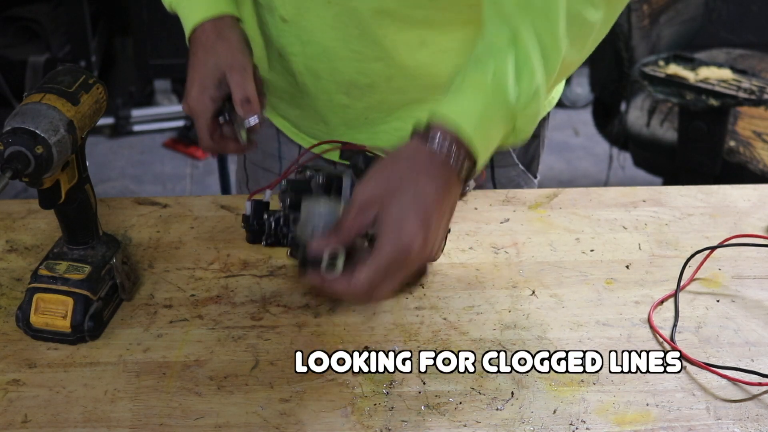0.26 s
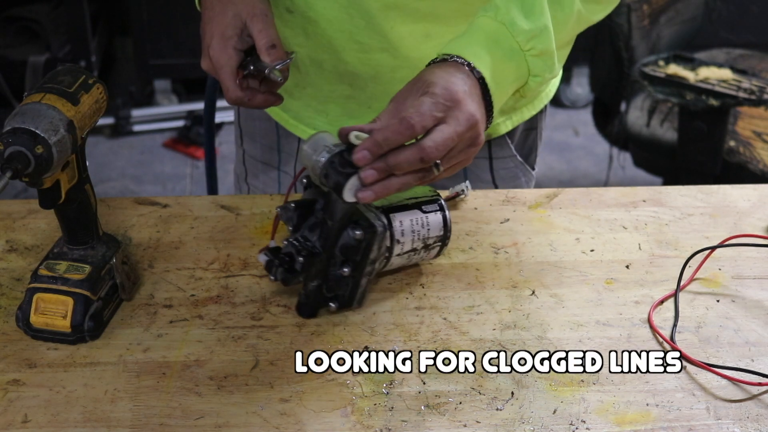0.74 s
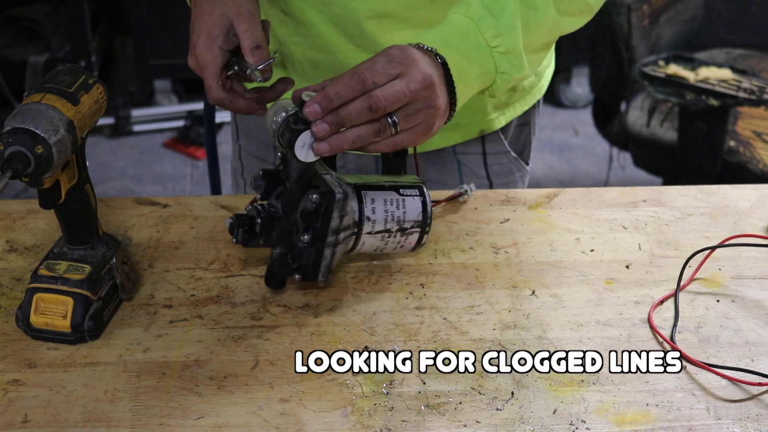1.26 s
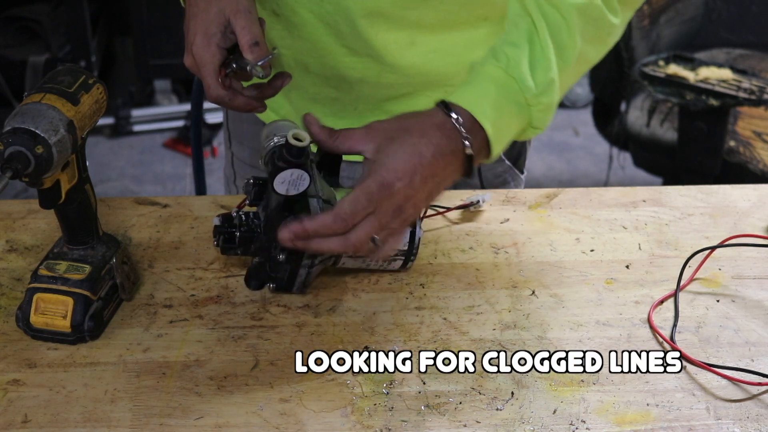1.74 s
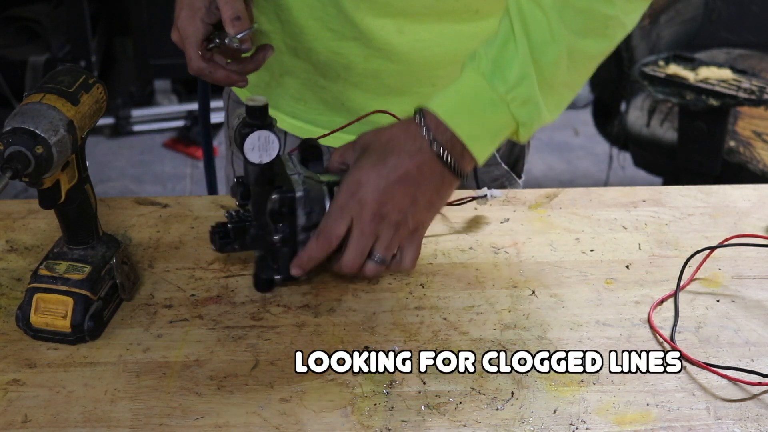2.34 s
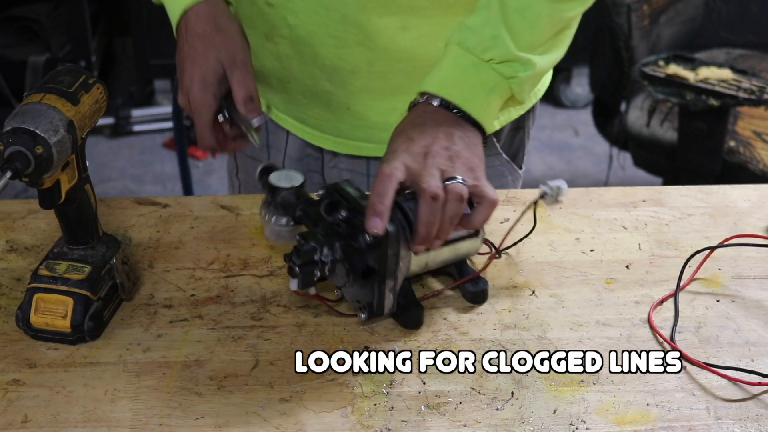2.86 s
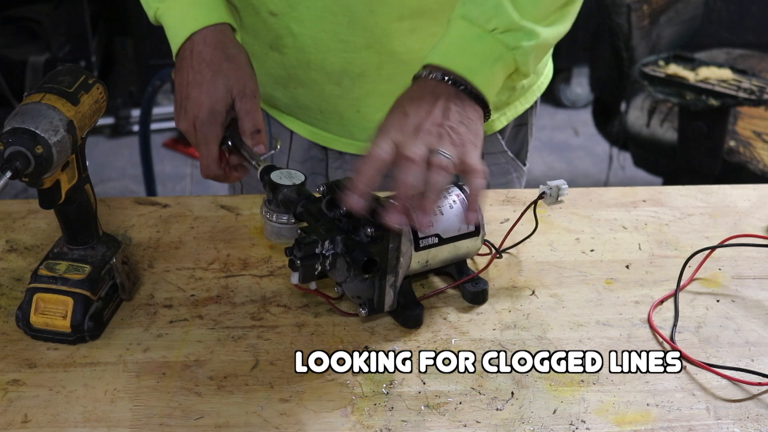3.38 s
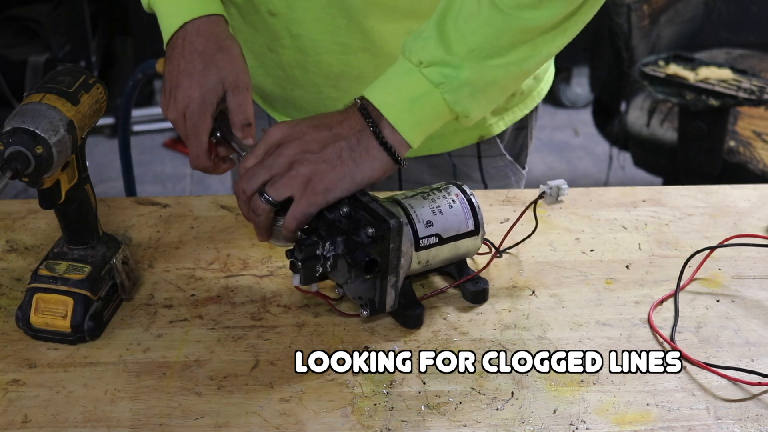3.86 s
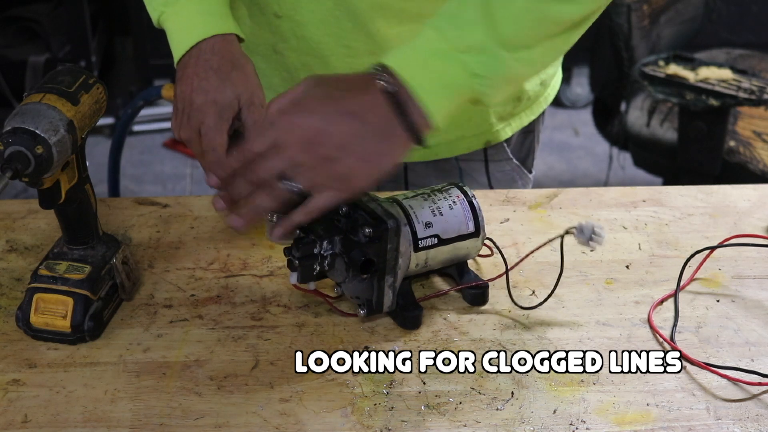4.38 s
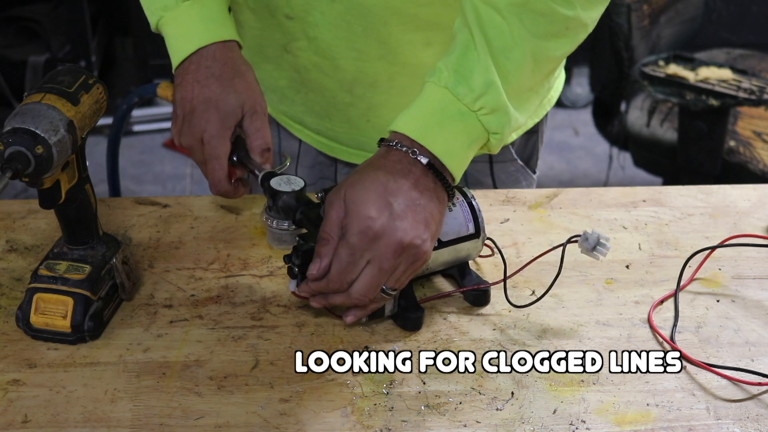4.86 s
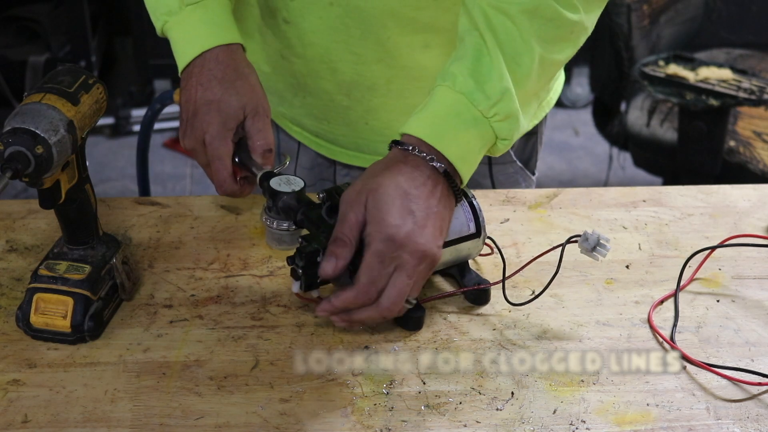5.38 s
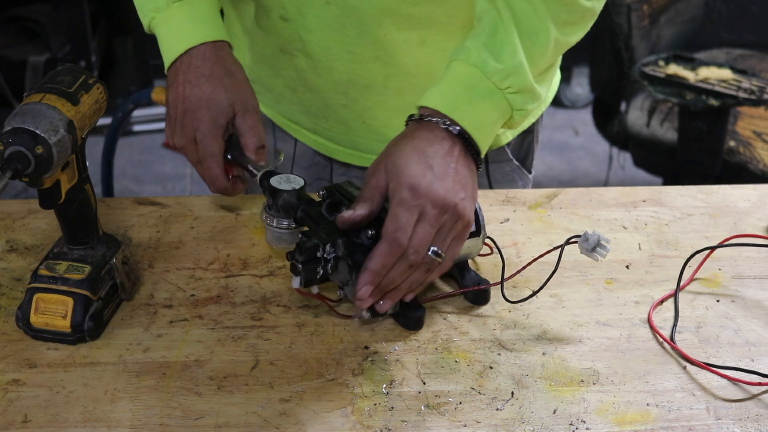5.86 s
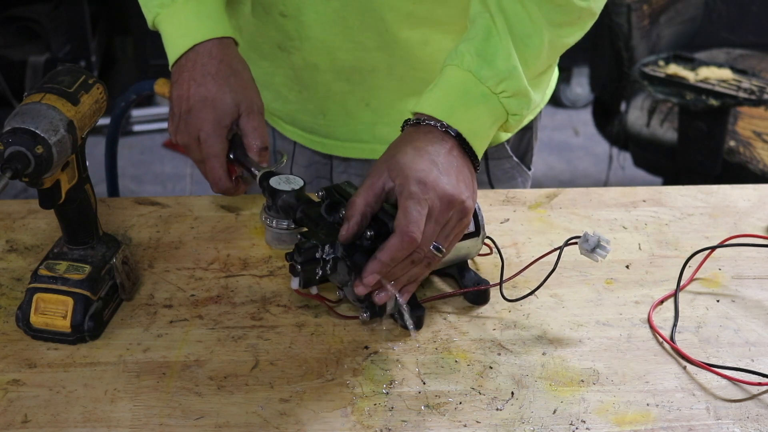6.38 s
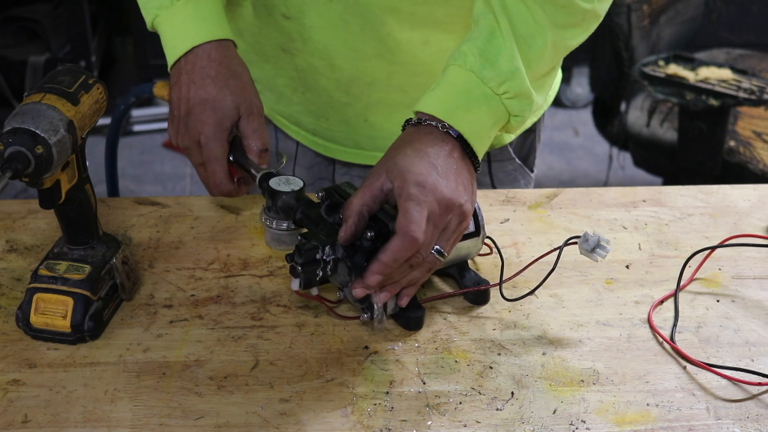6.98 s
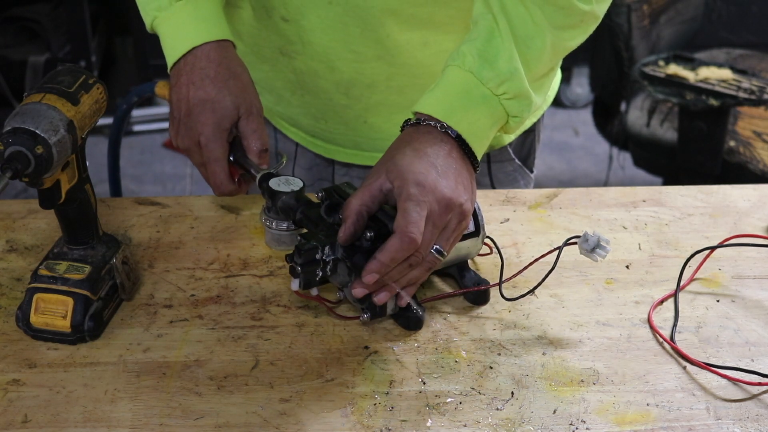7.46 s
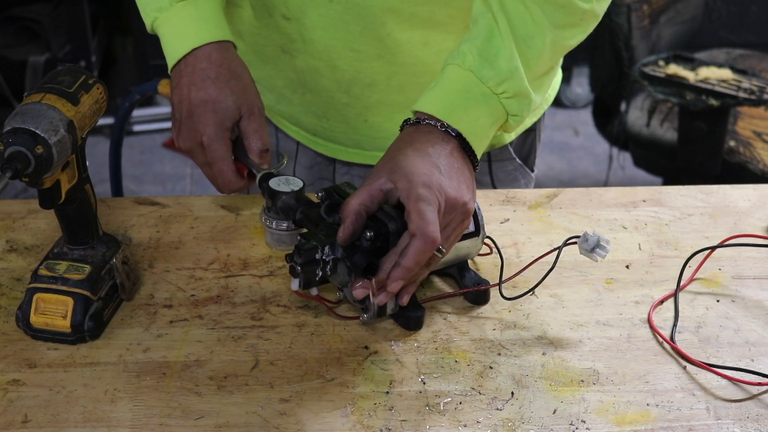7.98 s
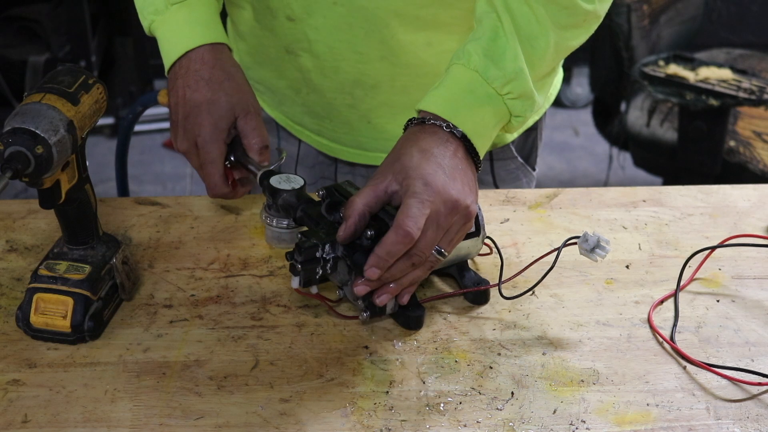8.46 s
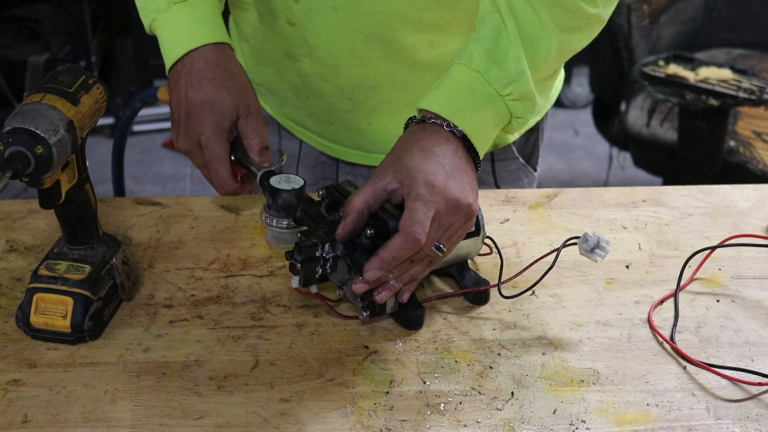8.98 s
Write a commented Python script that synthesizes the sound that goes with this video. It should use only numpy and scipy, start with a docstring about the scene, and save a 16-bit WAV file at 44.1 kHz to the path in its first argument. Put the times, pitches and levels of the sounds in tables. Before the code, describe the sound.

Small pump clunks and scrapes on a wooden workbench, then three hissing blasts of compressed air roar and gurgle through it.

```python
"""A workshop hums; on a wooden bench a small pump is scraped, ticked and thudded about as it is turned and set down.
Then a blow gun sends three blasts of air into its inlet: hiss at the nozzle, roar through the pump chambers.
Hum, rubbing and air are coloured noise; thuds are decaying bench tones; ticks are snaps in a narrow band.
Squeak, whistle and a far motor are wavering tones. The room adds sparse fading echoes to air and knocks."""
import sys
import numpy as np
from scipy import signal
from scipy.io import wavfile
from scipy.ndimage import uniform_filter1d

SR = 44100
rng = np.random.default_rng(int(sys.argv[2]) if len(sys.argv) > 2 else 0)


def materialize(psi):
    """Save the field psi as 16-bit PCM at rate SR to the path in sys.argv[1].

    A 1-D psi becomes a single channel; in a 2-D psi each row is a channel.
    """
    bounded = np.clip(np.atleast_2d(psi).T, -1, 1)
    quanta = np.round(bounded * 32767).astype(np.int16)
    wavfile.write(sys.argv[1], SR, quanta)


def volts_from_db(level):
    """Convert decibel levels to linear amplitude ratios."""
    exponent = np.asarray(level, float) / 20
    return 10 ** exponent


N = 406602


def read(points, hz):
    """Reads a table over pitch, joining its points on a log pitch axis."""
    pitch_hz, value = np.transpose(points)
    return np.interp(np.log(hz + 1), np.log(pitch_hz + 1), value)


def follow(rows, column, rest=-120):
    """Gives one column of a timed table at every sample, and the rest value outside its times."""
    out = np.full(N, float(rest))
    rows = np.array(rows)
    at = np.arange(round(rows[0, 0] * SR), min(round(rows[-1, 0] * SR), N))
    out[at] = np.interp(at / SR, rows[:, 0], rows[:, column])
    return out


def add(mix, start_s, sound):
    """Mixes a sound in from its start time."""
    part = mix[:, round(start_s * SR):][:, :sound.shape[1]]
    part += sound[:, :part.shape[1]]


def no_phase(hz):
    """Leaves left and right in step at every pitch."""
    return 0 * hz


def noise(colour_db, same, patchy_db, phase=no_phase, size=1024):
    """Makes stereo noise from random short spectra with drifting patches; left and right average to rms 1."""
    hz = np.fft.rfftfreq(size, 1 / SR)
    a, b, c, d, patch = rng.standard_normal((4 * N // size + 5, len(hz), 5)).T
    patch = uniform_filter1d(patch, size=10, axis=0)  # smooth over pitch
    patch = uniform_filter1d(patch, size=8, axis=1)  # smooth over time
    like = np.clip(read(same, hz), -1, 1)[:, None]
    left = a + 1j * b
    right = like * left + np.sqrt(1 - like ** 2) * (c + 1j * d)
    right = right * np.exp(-1j * phase(hz))[:, None]
    level_db = colour_db(hz)[..., None] + patchy_db * patch / patch.std()
    spectra = np.array([left, right]) * volts_from_db(level_db)
    x = signal.istft(spectra, nperseg=size, noverlap=size - size // 4)[1][:, :N]
    return x / x.mean(0).std()


def gritty(spread_db, size):
    """Fast uneven gain with mean power 1: spits, grains and stick-slip. Size is the smoothing in samples."""
    rough = uniform_filter1d(rng.standard_normal(N), size)
    gain = volts_from_db(spread_db * rough / rough.std())
    return gain / np.sqrt(np.mean(gain ** 2))


# colour of the shop hum, then of the deep rumble: pitch_hz, level_db (per Hz, relative)
HUM_COLOUR = [(15, -39), (25, -3), (49, -0.5), (144, -3.5), (174, -0.5), (361, -5), (435, -1), (586, -10.5),
              (901, -13), (1460, -14), (3470, -25), (8000, -32), (11500, -35), (15700, -42)]
DEEP_COLOUR = [(15, -31), (30, -10), (60, 7), (110, -3.5), (200, -9), (400, -80.5)]
# how alike left and right are: pitch_hz, likeness (-1 to 1)
HUM_LIKENESS = [(60, 0.97), (180, 1), (550, 0.73), (1650, -0.31), (4970, -0.28), (15000, 0.25)]
# swells of the deep rumble: start_s, level_db
DEEP_SWELLS = [(5.05, -70), (5.45, -59), (5.7, -44), (6.0, -42), (6.3, -58), (8.3, -63), (8.6, -44),
               (9.22, -50)]


def hum():
    """Distant machines and air as steady coloured noise, over a deep rumble that swells now and then."""
    shop_hum = noise(lambda hz: read(HUM_COLOUR, hz), HUM_LIKENESS, 1.0, size=2048)
    deep = noise(lambda hz: read(DEEP_COLOUR, hz), HUM_LIKENESS, .7, size=4096)
    return volts_from_db(-41) * shop_hum + volts_from_db(follow(DEEP_SWELLS, column=1)) * deep


def fuzzy_tone(rows, width_hz):
    """A tone whose size and phase wander: a narrow band of noise on a pitch curve."""
    turns = np.cumsum(follow(rows, column=1, rest=0)) / SR
    r = np.exp(-np.pi * width_hz / SR)
    drive = rng.standard_normal(N) + 1j * rng.standard_normal(N)
    wander = signal.lfilter([1], [1, -2 * r, r * r], drive)
    tone = (wander * np.exp(2j * np.pi * turns)).real
    return volts_from_db(follow(rows, column=2)) * tone / tone.std()


# level of the far motor: start_s, level_db
MOTOR_LEVEL = [(0, -57.5), (5.3, -60), (5.6, -41), (6.0, -39.5), (6.1, -47), (7.1, -52), (8.0, -48.5),
               (9.22, -45)]


def far_motor():
    """A far motor drones as a narrow wavering tone on one pitch."""
    pitch_hz = 111.7
    rows = [(start_s, pitch_hz, level_db) for start_s, level_db in MOTOR_LEVEL]
    return fuzzy_tone(rows, width_hz=9)


# colour of bench rumble, scraping feet, rustling wire and hand: pitch_hz, level_db (per Hz, relative)
RUMBLE_COLOUR = [(24, -46), (40, -17), (69, -6.5), (152, -2), (215, -2.5), (257, -1.5), (490, -9),
                 (641, -16), (1000, -26.5), (1300, -52), (2200, -120)]
SCRAPE_COLOUR = [(470, -22), (800, -0.5), (940, -14), (1120, 1), (1580, -1.5), (2340, -5), (3360, -6),
                 (5000, -32), (6500, -47), (11000, -120)]
RUSTLE_COLOUR = [(2820, -1.5), (4800, -4), (7980, -3.5), (8650, -6), (9430, -7.5), (15000, -20),
                 (16000, -31.5)]
# how alike left and right are, for rubbing and for air: pitch_hz, likeness (0 to 1)
AIR_LIKENESS = [(100, 1), (700, 0.99), (1300, 1), (2400, 0.86), (4400, 0.83), (8000, 0.7), (12000, 0.55),
                (15000, 0.6)]
# the pump rocks on after a blow: start_s, rumble_db, scrape_db, rustle_db
ROCKING = [(0.503, -23.5, -48, -51), (.6, -27, -49.5, -53), (1.55, -18, -43, -41.5),
           (1.59, -22, -44.5, -49), (2.099, -30, -49, -48)]
# how fast rocking dies: rumble_db_per_s, scrape_db_per_s, rustle_db_per_s
ROCKING_FADE = (80, 57, 72)
# the pump is dragged: start_s, strongest_s, end_s, then at the strongest rumble_db, scrape_db, rustle_db
DRAGGING = [(.12, 0.332, 0.52, -41, -45, -49), (0.326, 0.448, 0.51, -29.5, -36.5, -44),
            (1.56, 1.67, 1.81, -36, -49, -53), (1.794, 2.025, 2.13, -36, -43, -50.5),
            (2.23, 2.434, 2.8, -46, -46, -51.5), (2.492, 2.632, 2.7, -43.5, -71, -47),
            (2.85, 3.0, 3.12, -61.5, -49, -62), (3.05, 3.222, 3.42, -34, -40, -58),
            (4.078, 4.208, 4.4, -48.5, -50, -53)]


def handling():
    """The bench rumbles under the rocking or dragged pump; feet, wire and hand rub unevenly."""
    rumble = noise(lambda hz: read(RUMBLE_COLOUR, hz), [(60, .99), (900, .93)], 1.5, size=2048)
    rumble = rumble * gritty(1.2, size=500)
    scrape = noise(lambda hz: read(SCRAPE_COLOUR, hz), AIR_LIKENESS, 2.5, size=512) * gritty(2.5, size=90)
    rustle = noise(lambda hz: read(RUSTLE_COLOUR, hz), AIR_LIKENESS, 3, size=512) * gritty(1.8, size=60)
    t = np.arange(N) / SR
    swell = np.zeros((3, N))
    fading = volts_from_db(-np.outer(ROCKING_FADE, t[:SR]))
    for start_s, *level_db in ROCKING:
        add(swell, start_s, volts_from_db(level_db)[:, None] * fading)
    edge_db = -22  # a drag starts and ends this far below its strongest point
    for start_s, top_s, end_s, *level_db in DRAGGING:
        shape_db = np.interp(t, (start_s, top_s, end_s), (edge_db, 0, edge_db), -120, -120)
        swell += np.outer(volts_from_db(level_db), volts_from_db(shape_db))
    swell = uniform_filter1d(swell, size=300, axis=1)  # rubbing starts softly
    return swell[0] * rumble + swell[1] * scrape + swell[2] * rustle


# small parts that tick, by name: lowest_hz, highest_hz, left_minus_right_db,
# rattle_t60_s (time to fade 60 dB; anything under 0.002 plays as 0.002)
SMALL_PARTS = {"plastic": (2100, 4804, -7, -0.09), "nozzle": (2500, 13000, -.5, .035),
               "wire": (6000, 11500, -1, .009), "fitting": (1041, 2000, -3, -0.21),
               "connector": (1212, 8000, -9, -0.05), "clip": (10500, 14000, -11, .02),
               "drip": (1148.5, 1352, 3, -1), "valve": (770, 8200, 1, 0.016)}
# ticks of plastic, wire, fittings and the valve: start_s, peak_db, part
TICK_TIMES = [(0.417, -21, "connector"), (.443, -20, "connector"), (.4945, -14.5, "plastic"),
              (0.4953, -22, "wire"), (.4945, -25, "clip"), (1.578, -13, "plastic"), (1.585, -21, "plastic"),
              (.372, -25, "fitting"), (.482, -24, "wire"), (.482, -31, "clip"), (2.758, -36, "wire"),
              (2.764, -31, "connector"), (3.02, -41, "wire"), (1.923, -25, "connector"),
              (1.968, -35, "plastic"), (2.143, -26, "plastic"), (2.156, -27, "connector"),
              (2.164, -24, "plastic"), (2.176, -22.5, "connector"), (2.385, -33, "wire"),
              (2.398, -28.5, "wire"), (2.398, -29, "fitting"), (2.458, -33, "fitting"),
              (2.603, -26.5, "wire"), (2.602, -17, "plastic"), (2.648, -22.5, "plastic"),
              (2.758, -25, "plastic"), (2.77, -26.5, "fitting"), (4.228, -25, "plastic"),
              (4.238, -25, "connector"), (4.298, -15.5, "connector"), (4.298, -17, "plastic"),
              (4.298, -27, "wire"), (4.301, -22, "fitting"), (4.41, -55, "clip"), (4.889, -34, "wire"),
              (4.889, -39, "plastic"), (8.873, -17, "nozzle"), (8.412, -20, "drip"), (5.567, 1.5, "valve")]


def ticks():
    """A sharp snap followed by a short rattle, in the band the small part rings in."""
    soft_hz = 2500  # contacts are not quite sharp: treble slopes off above this
    out = np.zeros((2, N))
    t = np.arange(SR // 20) / SR
    rattles = rng.standard_normal((len(TICK_TIMES), len(t)))
    for (start_s, peak_db, part), rattle in zip(TICK_TIMES, rattles):
        low_hz, high_hz, side_db, t60_s = SMALL_PARTS[part]
        drive = (t == 0) + .25 * rattle * volts_from_db(-60 * t / max(t60_s, .002))
        drive = signal.lfilter([1], [1, -np.exp(-2 * np.pi * soft_hz / SR)], drive)
        band = signal.butter(4, [low_hz, high_hz], "bandpass", fs=SR, output="sos")
        tick = signal.sosfilt(band, drive)
        level_db = peak_db + np.array([[.5], [-.5]]) * side_db
        add(out, start_s, volts_from_db(level_db) * tick / abs(tick).max())
    return out


# the echoes of the shop: pitch_hz, t60_s (time to fade 60 dB)
SHOP_FADE = [(250, 0.43), (1000, 0.54), (4000, 0.52), (9000, 0.41), (15000, 0.32)]
# how alike the echoes are left and right: pitch_hz, likeness (0 to 1)
SHOP_LIKENESS = [(300, 0.78), (1500, 0.32), (6000, .3)]


def shop(x):
    """Sparse echoes of random sign, each band dying at its own speed; bass is more alike left and right."""
    taps = np.zeros((2, SR))
    at = np.arange(200, SR - 20, 20) + rng.integers(0, 20, (2, (SR - 201) // 20))
    np.put_along_axis(taps, at, rng.choice([-1., 1.], at.shape), 1)
    hz, t, z = signal.stft(taps, SR, nperseg=256)
    like = np.clip(read(SHOP_LIKENESS, hz), 0, 1)[:, None]
    z = np.array([z[0], like * z[0] + np.sqrt(1 - like ** 2) * z[1]])
    fade = volts_from_db(-60 * t / read(SHOP_FADE, hz)[:, None])
    tail = signal.istft(z * fade, SR, nperseg=256)[1]
    tail = tail / np.linalg.norm(tail[0])
    return signal.fftconvolve(x.mean(0)[None], tail, axes=1)[:, :N]


# blows on the bench: start_s, peak_db, high_lift_db (above 1000 Hz), deep_lift_db (below 200 Hz)
THUD_TIMES = [(0.482, -7, -7, 9.5), (0.4948, -9.5, -5, 10), (0.589, -5.5, -22, 8.5),
              (1.5367, 1.5, -10.5, 3), (1.5421, -9, -7, 16), (1.577, -1.5, -11, -10),
              (1.583, -12, -9.5, -17), (1.64, -9.5, -41, 9), (1.748, -17.5, -34, 4),
              (2.085, -12, -27, 13.5), (5.083, -33, -9, -9), (5.569, -14, -14, -8), (5.856, -14.5, -10, -6),
              (6.0, -17.5, -22, -3)]
# tones the bench rings with: pitch_hz, level_db (relative), t60_s (time to fade 60 dB)
BENCH_TONES = [(85, -11.5, 0.21), (164, 0.5, 0.046), (246, -3, 0.045), (260, -10, 0.1), (326, 12, 0.018),
               (384, 2, 0.024), (472, -11.5, 0.077), (750, -12.5, 0.066), (957, -15, 0.015),
               (1184, 10.5, 0.014), (1496, 16, 0.0051), (1980, 10.5, 0.0045), (2700, -5, 0.011),
               (3510, 1.5, 0.012), (4080, -79, 0.014)]


def thuds():
    """Each blow rings the bench with its own share of high and deep tones; deeper tones swell in later."""
    out = np.zeros((2, N))
    t = np.arange(SR // 3) / SR
    chance = rng.standard_normal((len(THUD_TIMES), len(BENCH_TONES)))
    for (start_s, peak_db, high_db, deep_db), spot in zip(THUD_TIMES, chance):
        blow = np.zeros(len(t))
        for (hz, tone_db, t60_s), luck in zip(BENCH_TONES, spot):
            level_db = tone_db + 1.5 * luck + high_db * (hz > 1000) + deep_db * (hz < 200)
            swell = 1 - np.exp(-1.5 * hz * t)
            blow += volts_from_db(level_db - 60 * t / t60_s) * swell * np.sin(2 * np.pi * hz * t)
        add(out, start_s, volts_from_db(peak_db) * np.array([blow, blow]) / abs(blow).max())
    return out


# wavering squeak of the rubber feet: start_s, pitch_hz, level_db
SQUEAK_CURVE = [(1.87, 3850, -72), (2.06, 4050, -64), (2.2, 4050, -69), (2.42, 4060, -62), (2.6, 4080, -58),
                (2.66, 4080, -61), (2.74, 4060, -71)]


def feet_squeak():
    """The rubber feet squeak faintly: a narrow wavering tone on a moving pitch."""
    return fuzzy_tone(SQUEAK_CURVE, width_hz=41)


# wavering whistle of the leaking nozzle: start_s, pitch_hz, level_db
WHISTLE_CURVE = [(4.41, 7300, -70), (4.45, 7400, -64), (4.5, 7350, -67), (4.55, 7700, -62),
                 (4.575, 7600, -64), (4.59, 6800, -66), (4.625, 7300, -68), (4.64, 6400, -66),
                 (4.66, 6500, -61), (4.68, 6500, -76)]


def nozzle_whistle():
    """The nozzle leaks a faint whistle: a wavering tone, wider than the squeak."""
    return fuzzy_tone(WHISTLE_CURVE, width_hz=120)


# the three blasts: valve_opens_s, rise_s, valve_closes_s, fall_s
BLAST_TIMES = [(5.047, .045, 5.566, .04), (5.736, .09, 8.335, .055), (8.869, .045, 9.4, .05)]


def valve(power):
    """Share of the full flow: the trigger opens and shuts smoothly, and the shut valve seeps."""
    t = np.arange(N) / SR
    flow = np.zeros(N)
    for opens_s, rise_s, closes_s, fall_s in BLAST_TIMES:
        way = np.clip(np.minimum((t - opens_s) / rise_s, 1 - (t - closes_s) / fall_s), 0, 1)
        flow += np.sin(np.pi / 2 * way) ** power
    return flow + volts_from_db(-43.5) * (t > BLAST_TIMES[0][0])


def resonance(x, rows, width_hz):
    """A moving band of x: shifts the pitch curve to zero, smooths twice and shifts back."""
    start = round(rows[0][0] * SR)
    band = np.zeros_like(x)
    turn = np.exp(2j * np.pi * np.cumsum(follow(rows, column=1, rest=0)[start:]) / SR)
    r = np.exp(-np.pi * width_hz / SR)
    smooth = signal.lfilter([(1 - r) ** 2], [1, -2 * r, r * r], x[:, start:] / turn)
    band[:, start:] = 2 * (turn * smooth).real
    return volts_from_db(follow(rows, column=2)) * band


# colour of gurgle in the wet outlet, roar in the chambers, whoosh in the inlet pipe, hiss at the
# inlet rim and sizzle of leaking air: pitch_hz, level_db (per Hz, relative)
GURGLE_COLOUR = [(120, -58), (200, -22), (447, -1), (642, -2), (722, 1.5), (796, 1), (1050, -5.5),
                 (1360, -35), (2310, -120)]
ROAR_COLOUR = [(560, -52), (950, -9), (1230, -2.5), (1680, -5), (1840, -7), (2240, 0), (2950, -7.5),
               (3840, -33), (6490, -120)]
WHOOSH_COLOUR = [(1680, -35.5), (2850, -2.5), (3110, -2.5), (3620, -0.5), (4080, -0.5), (4480, -5.5),
                 (4900, -8), (6370, -38), (10800, -120)]
HISS_COLOUR = [(2760, -41), (4700, -5.5), (5320, -1), (6040, 1.5), (6720, 1.5), (7770, 1.5), (9050, -3),
               (9700, -20.5), (12600, -32), (21300, -120)]
SIZZLE_COLOUR = [(5470, -28.5), (9300, -3), (13300, -4.5), (15100, -10.5), (15800, -4)]
# one row for each of those five, in that order: share following the passing air (the rest follows the leak), level_db
AIR_SHARES = [(0.99, -11), (1, 0.33), (0.74, -1.5), (0.43, -1.1), (.01, 0.5)]
# narrow resonances of the pump chambers: pitch_hz, width_hz, lift_db
CHAMBER_PEAKS = [(707, 33, 4.5), (1300, 100, -1), (1480, 51, -2), (1540, 91, 2.5), (2160, 56, 0.5),
                 (2570, 46, 3.5), (3450, 150, -1.5), (3700, 340, -4), (6200, 170, 2), (7600, 330, -3.5),
                 (8230, 200, 3.5)]
# which side each pitch leans to: pitch_hz, left_minus_right_db
SIDE_BY_PITCH = [(60, -17), (120, 9.5), (240, -0.5), (480, 0), (950, 0.5), (1890, -4), (3770, -1.5),
                 (7520, -0.5), (15000, 3)]
# how far left runs ahead of right: pitch_hz, lead_rad
LEFT_LEAD = [(0, 0.2), (1810, 0.36), (2410, 0.5), (3190, 0.058), (4740, 0.41), (5340, 0.9), (6460, 0.64),
             (8440, -0.0055), (9300, 1.4), (10700, 0.72), (11800, 0.84), (12700, 1.1), (13600, 0.4),
             (16600, -0.1)]
# where the air goes as nozzle and hand shift, with the valve open: start_s, passing_db (through the pump),
# leaking_db (at the inlet)
AIR_PATHS = [(5.05, -20, -19.5), (5.1, -27, -10.5), (5.19, -24, -12), (5.3, -17.5, -11.5), (5.4, -13, -7),
             (5.46, -14, -10.5), (5.55, -12.5, -3.5), (5.568, -4.5, -9), (5.6, -28, 2), (5.76, -20, -5),
             (5.81, -26.5, -7), (5.86, -16.5, -6.5), (6.0, -17, -5.5), (6.16, -20, -4), (6.21, -14.5, -5.5),
             (6.39, -13.5, -5), (6.44, -4, -6.5), (6.7, -4.5, -4.5), (6.97, -6.5, -6), (7.04, -9, -11),
             (7.33, -5, -9), (7.56, -6.5, -13), (7.8, -8, -11.5), (7.97, -6.5, -8), (8.08, -9, 1),
             (8.11, -11.5, -5), (8.15, -11.5, 0.5), (8.29, -11, -5), (8.34, -17, -14), (8.9, -12, -10.5),
             (8.98, -14, -8), (9.22, -13.5, -6.5)]
# two sounds stray from those paths: start_s, gurgle_lift_db, sizzle_lift_db
STRAY_LIFTS = [(5.05, -9, -1), (5.55, 0.8, -3.2), (5.9, 1.2, 1), (6.2, 4, 1.1), (6.45, -1.3, 1),
               (7.1, 2.5, 1), (7.5, -0.4, 2), (7.9, 0.5, -.1), (8.02, -4.5, -4.5), (8.28, -3.5, -2.5),
               (8.37, 4, 0), (8.9, 3, 1), (9.22, -0.8, 2.2)]
# resonances that move as the nozzle shifts in the inlet: start_s, pitch_hz, band_db (added to the air there)
PIPE_BAND = [(5.05, 3450, -7), (5.33, 3670, -7), (5.8, 3310, -0.5), (6.07, 3160, 1.5), (6.36, 3540, -9),
             (6.44, 3650, 3), (7.04, 3580, -0.5), (7.16, 3430, -0.5), (7.78, 3410, -6), (8.19, 3760, -2),
             (8.29, 3480, -3), (9.029, 3420, -11), (9.14, 3620, -32), (9.22, 3530, -13)]
RIM_BAND = [(5.05, 7640, -7), (6.12, 7470, 3), (6.25, 7770, -1), (6.72, 7100, -3.5), (7.2, 7700, -8),
            (7.43, 7400, -21), (7.9, 7600, -17), (8.06, 7900, -6), (8.31, 7800, -6), (8.57, 7500, -11),
            (9.22, 7700, 2.5)]
GAP_BAND = [(5.74, 12600, -37), (5.85, 13000, -19), (6.0, 11400, 1), (6.12, 11900, -7), (6.32, 12300, -20),
            (6.45, 12000, -25)]
# the air leans aside: start_s, left_minus_right_db (before the mean of the column is taken off)
AIR_LEAN = [(5.0, -3), (6.1, -2.4), (6.5, -2.9), (8.28, -3.5), (8.6, -2.5), (9.22, -3.5)]


def air_colour(table):
    """A broad colour with the chamber peaks on it, and the side each pitch leans to."""
    def colour_db(hz):
        peaks_db = sum(lift_db / (1 + (2 * (hz - f) / width_hz) ** 2) for f, width_hz, lift_db in CHAMBER_PEAKS)
        return read(table, hz) + peaks_db + np.outer([.5, -.5], read(SIDE_BY_PITCH, hz))
    return colour_db


def air():
    """Turbulent air is noise coloured by the chambers it passes; drops of water make it spit."""
    spits = gritty(spread_db=0.52, size=120) * gritty(spread_db=0.59, size=2000)
    # a higher power starts later and ends sooner: the chambers fill later and empty sooner than the leak
    passing = volts_from_db(follow(AIR_PATHS, column=1)) * valve(power=2.56)
    leaking = volts_from_db(follow(AIR_PATHS, column=2)) * valve(power=1.2)
    gurgle_lift_db = follow(STRAY_LIFTS, column=1, rest=0)
    sizzle_lift_db = follow(STRAY_LIFTS, column=2, rest=0)
    lifts_db = (gurgle_lift_db, 0, 0, 0, sizzle_lift_db)
    colours = (GURGLE_COLOUR, ROAR_COLOUR, WHOOSH_COLOUR, HISS_COLOUR, SIZZLE_COLOUR)
    out = np.zeros((2, N))
    for (share, level_db), lift_db, table in zip(AIR_SHARES, lifts_db, colours):
        flow = passing ** np.clip(share, 0, 1) * leaking ** np.clip(1 - share, 0, 1)
        rush = noise(air_colour(table), AIR_LIKENESS, 0.8, phase=lambda hz: read(LEFT_LEAD, hz))
        out += volts_from_db(level_db + lift_db) * flow * rush
    pipe, rim = resonance(out, PIPE_BAND, width_hz=680), resonance(out, RIM_BAND, width_hz=1200)
    out = out + pipe + rim + resonance(out, GAP_BAND, width_hz=5800)
    lean_db = follow(AIR_LEAN, column=1, rest=0) - np.mean(AIR_LEAN, axis=0)[1]
    return out * spits * volts_from_db(np.outer([.5, -.5], lean_db))


def scene():
    """All sources near the microphone, with the shop answering the air and the knocks."""
    background = hum() + far_motor()
    rubbing = handling()
    knocks = ticks() + thuds()
    tones = feet_squeak() + nozzle_whistle()
    blast = air()
    echoes = shop(volts_from_db(-9) * (blast + knocks))
    return background + rubbing + knocks + tones + blast + echoes


def gain_control(x, size=220):
    """Loud sound pulls the gain down quickly; it creeps back up slowly. Size is one gain step in samples."""
    knee_db, taken = -22.5, 0.79  # this share of the decibels above the knee is taken off
    fall_s, recover_db_per_s, start_db = 0.074, 5.5, -3
    power = uniform_filter1d((x ** 2).mean(0), size=4 * size, origin=2 * size - 1)[::size]
    level_db = 10 * np.log10(abs(power) + 1e-12)
    wanted_db = -taken * np.maximum(level_db - knee_db, 0)
    gain_db = [start_db]
    step_s = size / SR
    for goal_db in wanted_db[1:]:
        now_db = gain_db[-1]
        change_db = (goal_db - now_db) * min(step_s / fall_s, 1)
        gain_db.append(now_db + min(change_db, recover_db_per_s * step_s))
    return x * volts_from_db(np.interp(np.arange(N), size * np.arange(len(wanted_db)), gain_db))


def band_limit(x):
    """A steep low-pass at the top of the band."""
    return signal.sosfilt(signal.butter(12, 17090, fs=SR, output="sos"), x)


def record(dry):
    """Bass roll-off, gain control, treble limit and hard ceiling."""
    thinned = signal.sosfilt(signal.butter(2, 35, "highpass", fs=SR, output="sos"), dry)
    treble_limit = signal.firwin(numtaps=511, cutoff=15790, fs=SR)[None]
    limited = signal.oaconvolve(gain_control(thinned), treble_limit, "same")
    return band_limit(np.clip(limited, -1, 1))


dry = scene()
out = record(dry)
materialize(out)
```